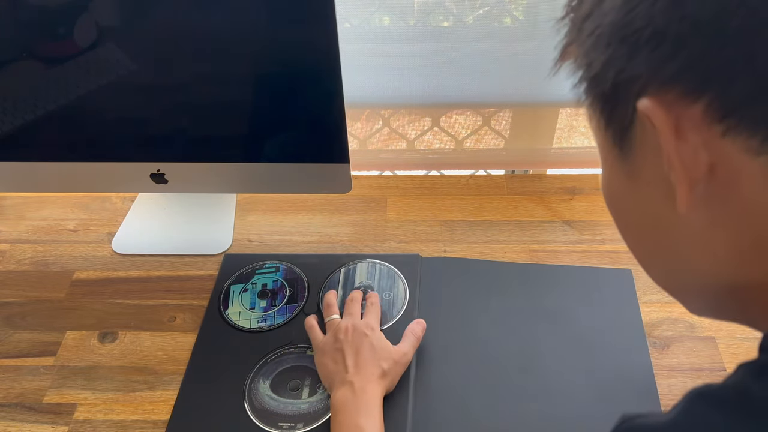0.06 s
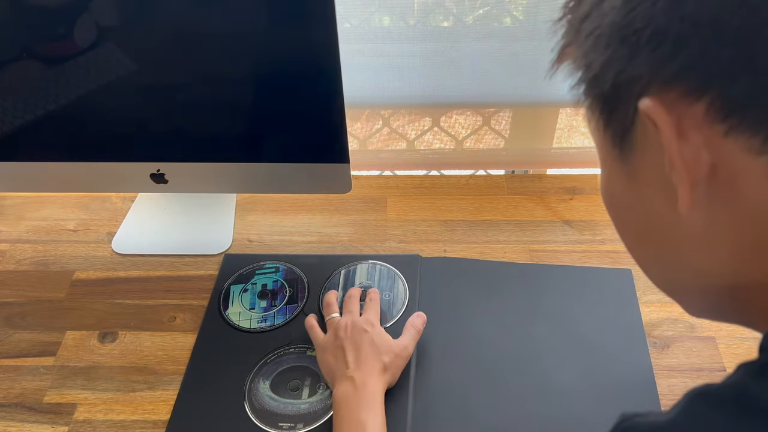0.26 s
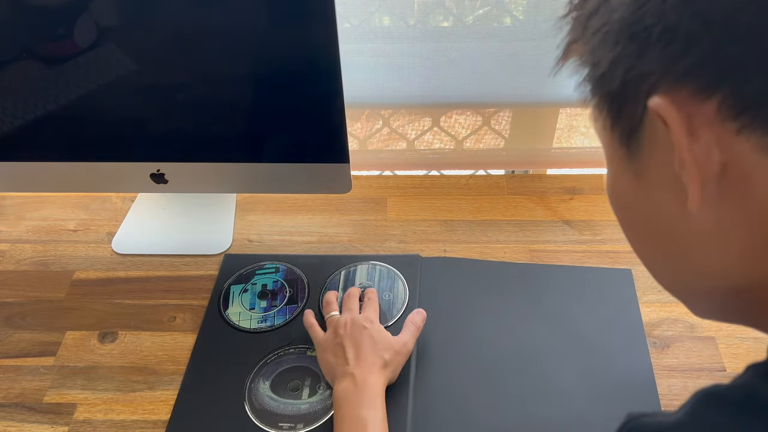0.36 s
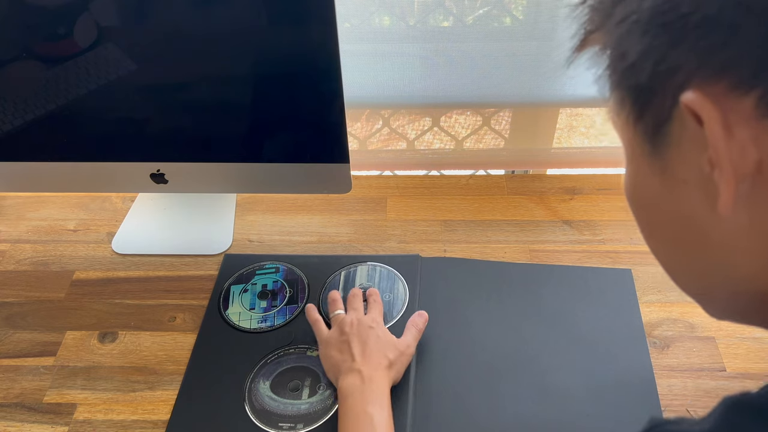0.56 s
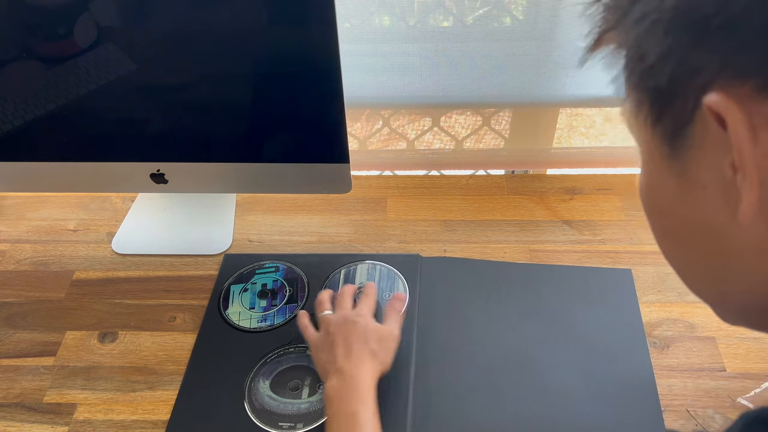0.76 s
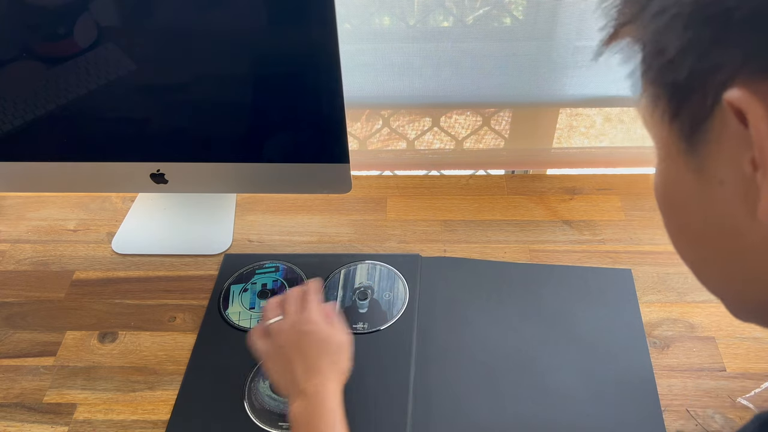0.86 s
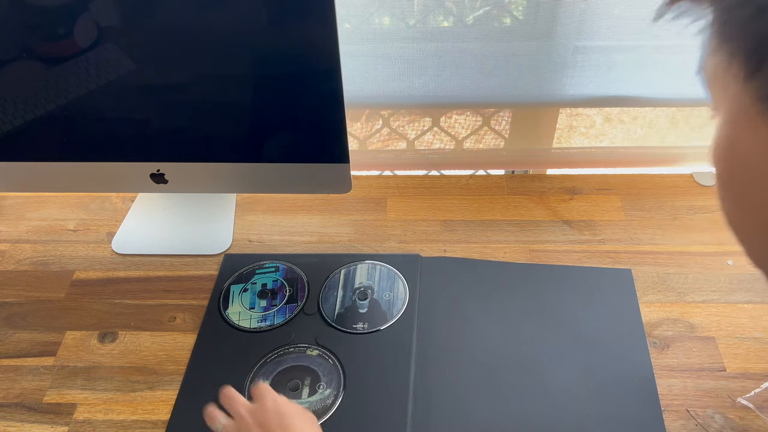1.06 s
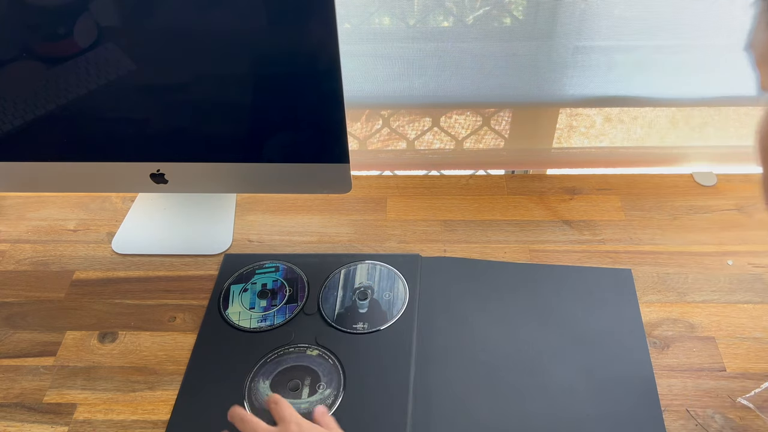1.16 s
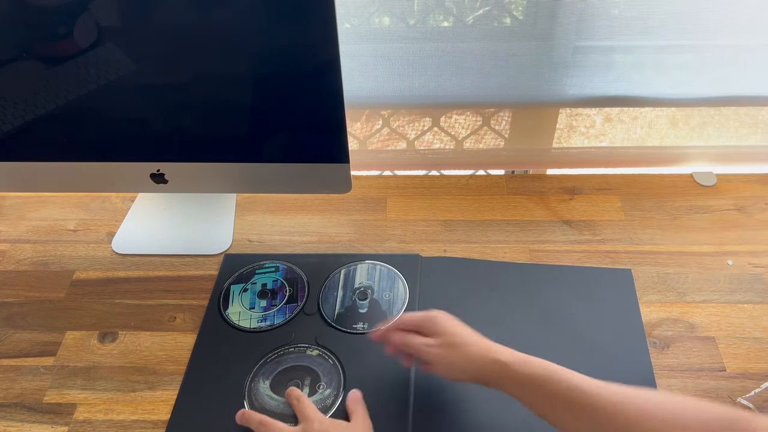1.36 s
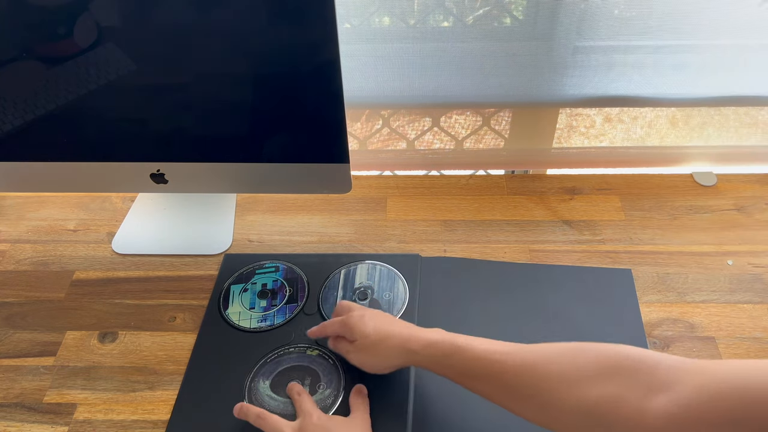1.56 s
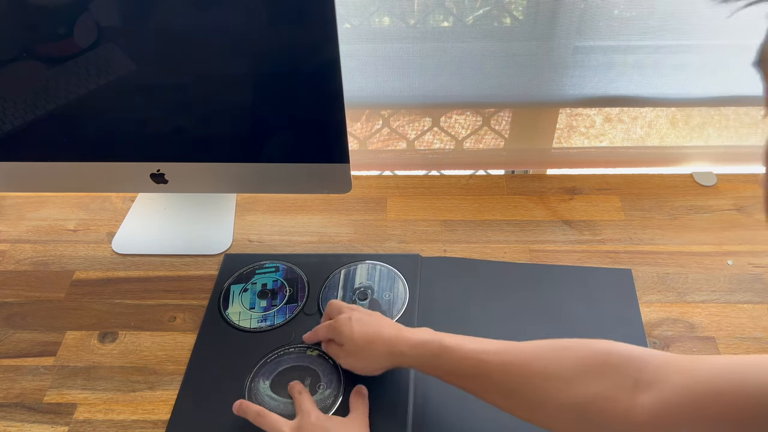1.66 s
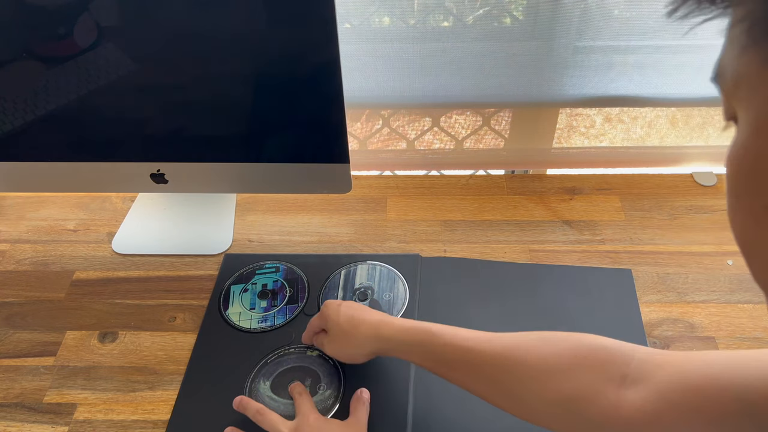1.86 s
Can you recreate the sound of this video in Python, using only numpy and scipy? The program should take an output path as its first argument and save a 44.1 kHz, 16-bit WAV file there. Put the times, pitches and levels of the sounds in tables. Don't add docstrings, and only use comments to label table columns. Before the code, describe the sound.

Hard plastic snaps of a disc pressed onto its hub: a creak, a loud crack, a second click, then a light tap, finger squeaks and sticky peeling ticks, close microphone in a small humming room.

```python
import sys
import numpy as np
from scipy import signal
from scipy.fft import rfft, irfft, next_fast_len
from scipy.io import wavfile
from scipy.ndimage import map_coordinates

SR = 44100
rng = np.random.default_rng(int(sys.argv[2]) if len(sys.argv) > 2 else 0)


def unload_wav(signal):
    wavfile.write(
        sys.argv[1],
        SR,
        np.round(np.clip(np.atleast_2d(signal).T, -1, 1) * 32767).astype(np.int16),
    )


def volts(x):
    e = np.asarray(x, float) / 20
    return 10 ** e


N = 83790

TOP_HZ = 15900


def unit(x):
    return x / np.sqrt(np.mean(x ** 2) + 1e-20)


def along(points, hz):
    f, v = np.transpose(points)
    return np.interp(np.log(hz + 1), np.log(f + 1), v)


def curves(rows):
    s, *cols = np.transpose(rows)
    return [np.interp(np.arange(N) / SR, s, c) for c in cols]


def filtered(x, response):
    m = next_fast_len(len(x) + SR // 4)
    return irfft(rfft(x, m) * response(np.fft.rfftfreq(m, 1 / SR)), m)[:len(x)]


def peak(hz, width_hz):
    return lambda f: 1j * f * width_hz / (hz * hz - f * f + 1j * f * width_hz)


def add(track, s, x):
    part = track[round(s * SR):][:len(x)]
    part += x[:len(part)]


def wobble(rate):
    return map_coordinates(rng.standard_normal(int(N * rate / SR) + 4), [np.arange(N) * rate / SR])


def background():
    # pitch_hz [Hz], level_db [dB per Hz]
    hum_tone = [(15, -63), (25, -40), (43, -29), (139, -5), (236, 0.5), (312, -6), (522, -18.5), (635, -12),
                (700, -17), (910, -42.5), (1540, -120)]
    air_tone = [(300, -33.5), (500, 1.5), (800, -6), (1200, -8), (2000, -13.5), (3600, -15), (4600, -10),
                (5800, -19), (10000, -24.5), (14500, -34.5), (16000, -48)]
    # pitch_hz [Hz], level_db [dB]
    hiss_tone = [(3000, -33.5), (8000, -1), (12000, -2), (15500, 2), (16000, -36.5)]
    # time_s [s], hum_db [dB], air_over_hum_db [dB]
    levels = [(0, -65.5, 4), (.19, -62.5, -2.5), (.22, -64.5, -2.5), (.45, -69.5, 2), (.7, -63.5, -1.5),
              (.9, -62.5, -0.5), (1.3, -65, 1), (1.6, -65, -1.5), (1.66, -65, -3), (1.9, -69, -0.5)]
    # time_s [s], level_db [dB]
    hiss_levels = [(.36, -100), (.5, -71), (.77, -70.5), (.79, -100)]

    def noise(tone):
        return unit(filtered(rng.standard_normal(N), lambda f: volts(along(tone, f))))

    hum_db, air_db = curves(levels)
    hiss_db, = curves(hiss_levels)
    hum = volts(hum_db + 1.3 * wobble(37)) * noise(hum_tone)
    air = volts(hum_db + air_db + 0.8 * wobble(9)) * noise(air_tone)
    return hum + air + volts(hiss_db) * noise(hiss_tone)


def tail(tone, stretch):
    # pitch_hz [Hz], time to fall by 60 dB t60_s [s]
    room = [(300, .2), (1000, 0.34), (3000, 0.38), (8000, 0.27), (15000, 0.25)]
    rise_s = 0.0033
    hz, t, z = signal.stft(rng.standard_normal(SR // 2), SR, nperseg=128)
    fade_db = -60 * t / (stretch * along(room, hz)[:, None])
    x = signal.istft(z * volts(fade_db), SR, nperseg=128)[1]
    x = filtered(x, lambda f: volts(along(tone, f)) * (f < TOP_HZ))
    x = x / np.sqrt(np.mean(x[:SR // 50] ** 2))
    return x * np.clip(np.arange(len(x)) / (rise_s * SR), 0, 1)


def rubs():
    # level_db [dB], centre_hz [Hz], width_hz [Hz]
    sounds = [(-68.5, 11600, 2500), (-70, 8000, 560), (-54, 730, 870), (-58.5, 12000, 6200),
              (-55.5, 3900, 4500), (-57.5, 1970, 1300), (-69, 5300, 3400), (-59, 680, 1320),
              (-60, 1330, 420), (-64.5, 700, 1960), (-65, 740, 560), (-74, 6500, 6800), (-58, 77, 170),
              (-63, 130, 90), (-64, 1200, 3500), (-55, 1500, 2100)]
    starts = [.028, .036, .699, .698, .758, .76, 1.035, 1.49, 1.505, 1.70, 1.82, 1.17, .75, .52, 1.03,
              .7345]
    lengths = [.045, .03, .009, .025, .022, .03, .055, .15, .07, .05, .05, .2, .05, .09, .05, .006]
    out = np.zeros(N)
    for s, length, (db, hz, width) in zip(starts, lengths, sounds):
        noise = rng.standard_normal(SR // 4)
        noise = unit(filtered(noise, lambda f: peak(hz, width)(f) ** 2 * (f < TOP_HZ)))
        progress = np.clip(np.arange(SR // 4) / SR / length, 0, 1)
        add(out, s, volts(db) * noise * np.sin(np.pi * progress ** 0.77))
    return out


def squeaks():
    # level_db [dB], from_hz [Hz], to_hz [Hz]
    sounds = [(-49, 2300, 2170), (-53, 2150, 2050), (-54, 7900, 7700), (-66, 3100, 3000), (-68, 3000, 2980),
              (-70, 2700, 2690), (-46, 1210, 1180)]
    starts = [.833, .857, .764, 1.318, 1.445, 1.15, 1.528]
    lengths = [.013, .005, .005, .022, .02, .02, .012]
    out = np.zeros(N)
    for s, length, (db, hz, to_hz) in zip(starts, lengths, sounds):
        progress = np.clip(np.arange(SR // 20) / SR / length, 0, 1)
        phase = 2 * np.pi * np.cumsum(hz + (to_hz - hz) * progress) / SR
        swell = np.sqrt(np.abs(np.sin(np.pi * progress)))
        add(out, s, volts(db) * swell * np.sin(phase))
    return out


def peeling():
    # start_s [s], peak level_db [dB]
    jolts = [(1.0248, -54), (1.0352, -54), (1.0385, -50), (1.0407, -51), (1.0415, -51), (1.0474, -52),
             (1.0556, -46), (1.0606, -51), (1.0612, -50), (1.0632, -51), (1.065, -52), (1.0688, -54),
             (1.0722, -52), (1.076, -50), (1.0782, -53), (1.0896, -46), (1.0932, -53), (1.1015, -55),
             (1.108, -45), (1.1097, -53), (1.1147, -48), (1.1226, -45), (1.13, -55)]
    skin_gain_db, top_hz = 13, 8500
    ticks = np.zeros(N)
    for s, db in jolts:
        add(ticks, s, volts(db + skin_gain_db) * rng.choice([-1.0, 1.0], 1))
    skin = peak(3400, 7000)
    return filtered(ticks, lambda f: skin(f) ** 2 / (1 + (f / top_hz) ** 8))


def fingers():
    out = rubs() + squeaks() + peeling()
    answer = tail([(300, 0), (16000, 0)], 1.0)
    answer = answer / np.linalg.norm(answer)
    return out + volts(-17) * signal.fftconvolve(out, answer)[:N]


def ringing(modes, swell_cycles, t):
    ring = np.zeros(len(t))
    for hz, level_db, t60 in modes:
        wander = 0.9 * wobble(60)[:len(t)] * np.clip(t / .03, 0, 1)
        swell = (1 - np.exp(-t * hz / swell_cycles)) ** 2
        ring += volts(level_db - 60 * t / t60) * np.sin(2 * np.pi * hz * t + wander) * swell
    return ring


def teeth_crack(teeth, t):
    length_s, grit_db = .0017, -10
    burst = np.sin(np.pi * np.clip(t / length_s, 0, 1) ** .75) ** 2
    lowest_hz = 2 * teeth[0][0] / 3
    grit = filtered(rng.standard_normal(len(t)), lambda f: volts(along(teeth, f)) * (f > lowest_hz))
    tones = sum(volts(level_db) * np.sin(2 * np.pi * hz * t) for hz, level_db in teeth)
    return burst * (tones + volts(grit_db) * grit)


def hubs():
    # start_s [s], level_db [dB], tail_db [dB], tail_stretch [factor], rebound_db [dB]
    hits = [
        (0.2366, -24, -46, 0.54, -6),
        (.3670, -9, -30.5, 0.74, -7),
        (0.4882, -18.5, -39, 0.79, -27),
        (.4970, -12.5, -36.5, 0.75, -16),
        (0.7391, -34.5, -49.5, 0.58, -10),
    ]
    # pitch_hz [Hz], level_db [dB], time to fall by 60 dB t60_s [s]
    creak, snap, nudge = [(555, -24.5, 0.18), (685, -7, 0.076), (920, -30, .07), (1150, -3, 0.044),
                          (1193, 0.5, 0.031), (1448, -4, 0.051), (1630, -51, 0.063), (2330, -33, 0.04),
                          (3020, -10.5, 0.031), (2890, -45, 0.062), (3061, -33, 0.067), (3245, -51, 0.08),
                          (5310, -15.5, 0.025)], [(263, -27, 0.063), (572, -23.5, 0.039), (691, -13.5, 0.055),
                                         (887, -22.5, 0.027), (1170, -9, 0.013), (1135, -3.5, 0.052),
                                         (1441, -5, 0.031), (2077, -15.5, 0.038), (2228, -24, .04),
                                         (2900, -19, .04), (3130, -17.5, 0.024), (5180, -13, 0.01),
                                         (1145, -37.5, .22), (3190, -29.5, .1)], [(756, -1, 0.012), (1088, 4, 0.009),
                                                       (1400, -12, .015)]
    seat, tap = [(263, -36.5, 0.043), (353, -17.5, 0.028), (726, -0.5, 0.028), (935, -9, 0.038),
                 (1118, 3.5, 0.028), (1650, -18, 0.036), (3780, -30.5, 0.0418), (6200, -25.5, 0.011),
                 (1095, -36.5, 0.39), (1180, -26, 0.33), (763, -34, 0.22), (600.6, -20.5, 0.125),
                 (898, -42, 0.19), (3320, -23.5, 0.073)], [(696, -7, 0.041), (783, 2.5, 0.035), (1135, 0.5, 0.03), (2430, -2, 0.016),
                               (2110, 5, 0.011), (2940, -24, .018), (4030, 4.5, 0.0096)]
    # pitch_hz [Hz], level_db [dB]
    creak_teeth, snap_teeth, nudge_teeth = [(3000, -7), (5300, -10), (7500, -34), (14800, -46)], [(3250, -5), (5450, 3), (8700, -5.5),
                                                                 (12000, -12), (14800, -15.5)], [(1700, -17),
                                                                                     (3000, -36.5)]
    seat_teeth, tap_teeth = [(2800, -17), (4000, -12.5), (6500, -11.5), (9000, -23), (11300, -15),
                             (13300, -20)], [(2100, 2), (2700, -19), (3450, 0.5), (4150, -13.5),
                                                 (5200, -30), (9000, -22)]
    # pitch_hz [Hz], level_db [dB per Hz]
    creak_tail, snap_tail = [(240, -57), (400, -23.5), (656, -6), (1630, -9), (2040, -35.5), (2650, -12),
                             (3100, -8.5), (3450, -12.5), (3960, -32.5), (5210, -19), (9000, -53.5),
                             (11700, -80), (19800, -120)], [ (300, -30), (650, -4.5), (1250, -12.5), (2300, -16.5),
                                                 (3200, -6), (4200, -11.5), (5400, -7), (11500, -16.5),
                                                 (16000, -39)]
    seat_tail, tap_tail = [(120, -50), (200, -18.5), (432, -17), (635, -2.5), (1180, -9), (1420, -25.5),
                           (1650, -19), (6400, -23), (16000, -40.5)], [(240, -43), (400, -10), (767, 0), (1340, -18), (2450, -12.5),
                                              (6250, -35), (9000, -41), (11700, -70), (19800, -120)]
    swells = [.45, .7, .2, .3, 1.0]
    contacts = [(creak, creak_teeth, creak_tail), (snap, snap_teeth, snap_tail),
                (nudge, nudge_teeth, seat_tail), (seat, seat_teeth, seat_tail), (tap, tap_teeth, tap_tail)]
    thump_db, thump_s = -29.5, 0.0017
    rebound_s, rebound = .0093, peak(3050, 1800)
    lines_gain, lines_width_hz = 1.1, 70

    out, t = np.zeros(N), np.arange(SR // 4) / SR
    for (s, db, tail_db, stretch, rebound_db), (modes, teeth, tone), swell in zip(hits, contacts, swells):
        sound = -volts(db) * (ringing(modes, swell, t) + teeth_crack(teeth, t))
        thump = volts(db + thump_db) * t / thump_s * np.exp(1 - t / thump_s)
        add(out, s, sound - thump)
        echo = filtered(sound, lambda f: rebound(f) ** 2)
        add(out, s + rebound_s, volts(rebound_db) * echo)
        answer = filtered(tail(tone, stretch), lambda f: 1 + lines_gain * sum(
            peak(hz, lines_width_hz)(f) for hz, *_ in modes))
        add(out, s, volts(tail_db) * answer)
    return out


def scene():
    low_hz = 151
    close = filtered(hubs() + fingers(), lambda f: (1j * f / (low_hz + 1j * f)) ** 2)
    return (close + background())[None]


def band_limit(x):
    return signal.sosfilt(signal.butter(12, 17100, fs=SR, output="sos"), x)


def record(dry):
    skew, top_hz = .05, 16500
    bent = dry[0] - skew * dry[0] ** 2
    bent = filtered(bent, lambda f: 1 / (1 + (f / top_hz) ** 80))
    return band_limit(np.clip(bent, -.97, .97)[None])


dry = scene()
out = record(dry)
unload_wav(out)
```